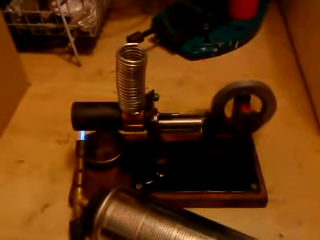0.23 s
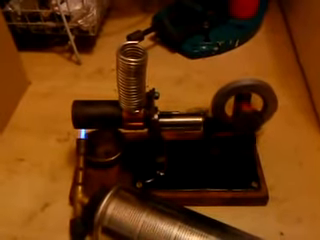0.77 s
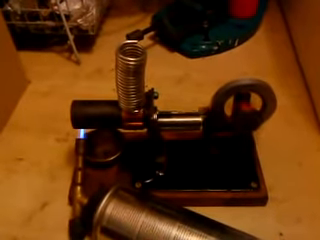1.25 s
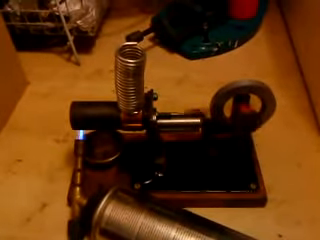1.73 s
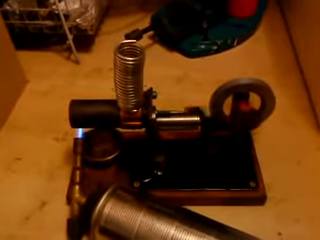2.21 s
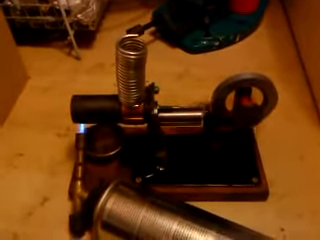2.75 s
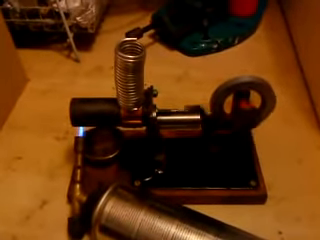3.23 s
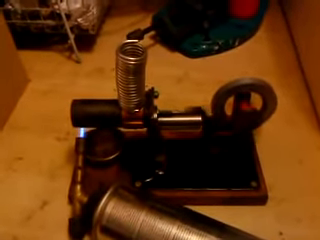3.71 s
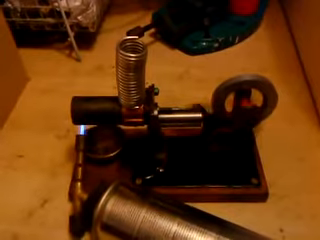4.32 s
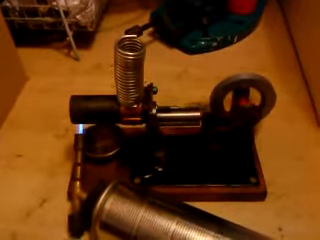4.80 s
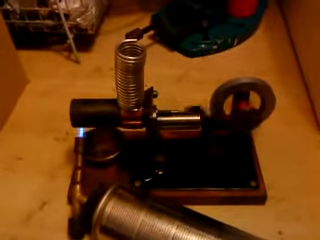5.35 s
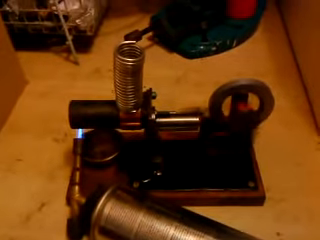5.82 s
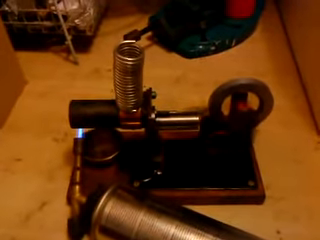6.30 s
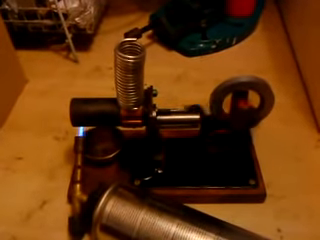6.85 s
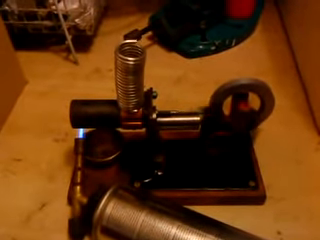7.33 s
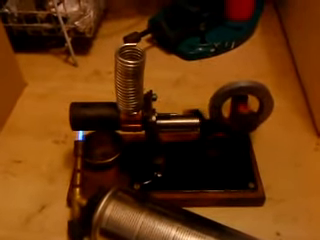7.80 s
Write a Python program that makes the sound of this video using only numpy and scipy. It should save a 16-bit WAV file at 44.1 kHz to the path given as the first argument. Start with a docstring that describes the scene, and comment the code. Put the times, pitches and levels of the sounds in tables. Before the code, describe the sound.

From 0 s a small hot-air engine is already running on a wooden base, close to the microphone, at nearly eight turns a second. Every turn has three blows: a sharp bright metallic clack, about an eighth of a second's quarter later a loose rattling knock over a soft thud, then around half a turn after the clack a duller tap and low wooden thump. Tiny random clicks and pin chatter fill the gaps; speed and force drift slightly. A gas torch hisses steadily with a fluttering edge and faint low rumble. At 5.2 s the rod gives a very short high squeak. Around 7.2-7.4 s the engine slows to under seven turns, the base shudders more and knocks grow bassier. It partly recovers, with another squeak at 7.8 s, the hiss rising slightly, and is still running at 8 s. Short, dry room reflections; mono, little extreme treble.

```python
"""A small hot-air engine turns about eight times a second on a wooden base; a gas torch hisses all along.
Each turn its slack closes three times: a sharp clack, a quarter turn later a rattling knock over a thud,
and half a turn after the clack a duller tap, then a thump of the base. The rod squeaks near 5.2 s.
Near 7.3 s the engine slows and labours: the base shudders more and the knocks gain bass. It recovers in
part, with another squeak at 7.8 s. Blows are ringing tones and noise bursts; the torch is steady noise."""
import sys
import numpy as np
from scipy import signal
from scipy.fft import rfft, irfft, next_fast_len
from scipy.io import wavfile
from scipy.ndimage import uniform_filter1d, map_coordinates

SR = 44100
rng = np.random.default_rng(int(sys.argv[2]) if len(sys.argv) > 2 else 0)


def master_out(mix):
    """Clip the mix to full scale and print it as 16-bit PCM to the path in sys.argv[1]."""
    frames = np.transpose(np.atleast_2d(mix))
    ceiling = np.clip(frames, -1, 1)
    pcm = np.round(ceiling * 32767).astype(np.int16)
    wavfile.write(sys.argv[1], SR, pcm)


N = 355446  # length of the scene in samples
LENGTH = 8192  # length of one blow in samples


def amp(db):
    """Turn dB into a plain factor."""
    return 10 ** (np.asarray(db) / 20)


def unit(x):
    """Scale a sound to an rms of 1."""
    return x / np.sqrt(np.mean(x ** 2) + 1e-20)


def at(curve, s):
    """Read a curve of (seconds, value) points at given times."""
    return np.interp(s, *np.transpose(curve))


def along(points, hz):
    """Read a curve of (Hz, value) points, with straight lines on a log frequency axis."""
    point_hz, value = np.transpose(points)
    return np.interp(np.log(hz + 1), np.log(point_hz + 1), value)


def noise(shape, spectrum):
    """Rows of noise with the given colour, scaled to an rms of 1 overall."""
    hz = np.fft.rfftfreq(shape[-1], 1 / SR)
    white = rfft(rng.standard_normal(shape))
    return unit(irfft(white * amp(along(spectrum, hz)), shape[-1]))


def wobble(rate):
    """A smooth random curve with the given number of random points a second."""
    points = rng.standard_normal(int(N * rate / SR) + 4)
    return map_coordinates(points, [np.arange(N) * rate / SR])


def placed(times, sounds):
    """Add up rows of sound, each starting at its own time."""
    first = np.round(np.asarray(times) * SR).astype(int)
    index = first[:, None] + np.arange(sounds.shape[1])
    return np.bincount(index.ravel(), sounds.ravel(), N + sounds.shape[1])[:N]


# The frequencies in Hz where the bass, middle and treble levels of a blow apply.
BAND_HZ = [400, 1800, 5000]


def strength(levels_db, hz):
    """Spread the three band levels of every blow, in dB, over all frequencies."""
    return np.array([along(np.transpose([BAND_HZ, row]), hz) for row in levels_db])


# Loudness of the flame. Each row: time in seconds, level in dB before the 4 dB cut in torch().
HISS_LEVEL = [(0.0, -36), (6.911, -35), (7.25, -34.5), (8.06, -30)]
# Colours of the flame and of the low rumble under it. Each row: frequency in Hz, relative level in dB.
FLAME_COLOUR = [(200, -3.5), (400, 4), (900, -4), (1700, 1.5), (2300, -2), (3000, -9.5), (4200, -2.5),
                (5300, -6.5), (6000, -12), (8000, -11), (9200, -42), (12000, -120)]
RUMBLE_COLOUR = [(15, -27), (25, -20), (48, 2.5), (107, -1.5), (125, -9), (160, -40.5), (280, -120)]


def torch():
    """The flame is noise whose level flutters fast and slowly; a faint low rumble lies under it."""
    m = next_fast_len(N)
    flutter_db = 1.8 * wobble(40) + 0.42 * wobble(5.9)
    hiss_db = at(HISS_LEVEL, np.arange(N) / SR) - 4.0 + flutter_db
    hiss = amp(hiss_db) * noise((m,), FLAME_COLOUR)[:N]
    rumble = amp(-57 + wobble(5)) * noise((m,), RUMBLE_COLOUR)[:N]
    return hiss + rumble


# The base shakes more as the engine labours. Each row: time in seconds, level in dB.
SHUDDER_LEVEL = [(0, -50), (6.8, -53.5), (7.3, -43.5), (8.06, -44)]


def shudder():
    """The base trembles on the table: low noise with an unsteady level."""
    colour = [(40, -34.0), (80, -1), (200, 1), (380, -7.0), (600, -25), (1200, -120)]  # (Hz, dB)
    level_db = at(SHUDDER_LEVEL, np.arange(N) / SR) + 1.2 * wobble(25)
    return amp(level_db) * noise((next_fast_len(N),), colour)[:N]


def rattle(levels_db, spectrum, crack_db, crack_t60, wash_db, wash_t60, rise, lumpy_db):
    """Pins chatter in their holes: a short crack and a longer, lumpy wash of noise (t60 and rise in s)."""
    t = np.arange(LENGTH) / SR
    shape = (len(levels_db), LENGTH)
    lumps = unit(uniform_filter1d(rng.standard_normal(shape), size=50))
    crack = amp(crack_db - 60 * t / crack_t60)
    wash = amp(wash_db - 60 * t / wash_t60 + lumpy_db * lumps)
    tilt = amp(strength(levels_db, np.fft.rfftfreq(LENGTH, 1 / SR)))
    tilted = irfft(rfft(noise(shape, spectrum)) * tilt, LENGTH)
    return tilted * (crack + wash) * (1 - np.exp(-t / rise))


# Colour of the pins' chatter in knocks, small ticks and strays.
# Each row: frequency in Hz, relative level in dB.
KNOCK_COLOUR = [(410, -21.5), (700, -11), (832, -27), (1620, -0.5), (2720, -3.5), (3100, -12), (3800, -2),
                (5250, -4), (7420, -11), (9200, -32.5), (12000, -76), (20200, -120)]


def strays():
    """The linkage makes tiny clicks at random moments, each a short rattle of random strength."""
    count = 110
    chance = rng.random((count, 3))
    levels_db = -44 + 6.9 * chance[:, [1, 1, 2]]  # bass and middle share one draw
    clicks = rattle(levels_db, KNOCK_COLOUR, 0, 0.0058, -18.5, .03, .0003, 2.5)
    return placed(chance[:, 0] * N / SR, clicks)


# Squeaks of the piston rod. Each row: start in seconds, length in seconds, pitch in Hz, middle level in dB.
ROD_SQUEAKS = [(5.224, 0.051, 5220, -42), (7.8, 0.068, 5290, -39)]


def squeaks():
    """The dry sliding rod sings briefly: a tone with slightly unsteady level and phase."""
    t = np.arange(N) / SR
    total = np.zeros(N)
    for start, length, hz, db in ROD_SQUEAKS:
        fade = np.clip(np.minimum(t - start, start + length - t) / .008, 0, 1)  # 8 ms at each end
        level = amp(db + 1.2 * wobble(80))
        total += level * fade * np.sin(2 * np.pi * hz * t + .4 * wobble(120))
    return total


# Speed of the flywheel, which drifts, slows near 7.3 s and partly recovers.
# Each row: time in seconds, turns per second.
TURNING_SPEED = [(0, 7.824), (.2, 8.023), (.92, 7.842), (1.58, 7.751), (2.42, 8.136), (3.2, 7.728),
                 (3.8, 8.112), (3.98, 8.142), (5.42, 7.817), (5.6, 7.914), (6.02, 8.208), (6.74, 7.823),
                 (6.98, 8.019), (7.34, 6.727), (7.52, 7.033), (8.06, 7.328)]
# How hard the slack closes. Each row: time in seconds, force in dB before each blow's share of it.
CLOSING_FORCE = [(0, -1), (.35, 0.54), (1.2, -1.4), (1.63, 1.3), (2.3, -1.04), (2.9, 0), (3.4, 1.76),
                 (3.6, 0.5), (4, 1.5), (4.65, -1.1), (4.95, 0.3), (5.8, 0), (6.15, -0.6), (6.62, 1.5),
                 (7.15, 0), (7.43, -4), (7.6, 0.3), (8.06, 3)]
# How much the engine labours. Each row: time in seconds, amount where 1 is about full labour.
LABOURING = [(0, 0.26), (6.9, 0.15), (7.1, 0.34), (7.33, 1.05), (7.5, 0.88), (7.8, 0.92), (8.06, 0.4)]
# The five tables below have one row each for clack, knock and tap; the last four list bass, middle, treble.
# Each row: crank angle in turns, lag in seconds, random timing spread in seconds.
BLOW_MOMENT = [(0, 0, .0003), (.1, .0195, .0006), (.4, .0156, .0006)]
# Each row: the three usual levels in dB.
USUAL_LEVEL = [(-1, -0.14, -1.67), (-2, -3.5, -2.5), (-1.34, -0.4, 1.5)]
# Each row: the three shares of the force in dB that the blow follows.
FORCE_SHARE = [(0.78, 1.1, 1), (0.55, 1.3, 1.1), (.8, .7, .6)]
# Each row: the three gains in dB per unit of labour.
LABOUR_GAIN = [(.8, .8, -2.5), (11.3, .4, -0.6), (.2, 5, 1.2)]
# Each row: the three random level spreads in dB.
LEVEL_SPREAD = [(.7, .9, .5), (1.2, 1.5, 1.1), (.7, 1.2, .9)]


def blows(order):
    """The turning crank closes the slack once a turn: times in s and three band levels in dB per blow."""
    lead = SR // 10  # begin 0.1 s early
    t = np.arange(-lead, N) / SR
    turns = np.cumsum(at(TURNING_SPEED, t)) / SR
    turns = turns - turns[lead] + .1587  # the crank position in turns at time 0
    angle, lag, jitter = BLOW_MOMENT[order]
    chance = rng.standard_normal((int(turns[-1]) + 1, 4))
    crank_s = np.interp(np.arange(len(chance)) + angle, turns, t, right=N / SR)
    s = crank_s + lag + jitter * chance[:, 0]
    force_db = np.outer(at(CLOSING_FORCE, s), FORCE_SHARE[order])
    labour_db = np.outer(at(LABOURING, s), LABOUR_GAIN[order])
    levels_db = USUAL_LEVEL[order] + force_db + labour_db + LEVEL_SPREAD[order] * chance[:, 1:]
    heard = (s > .005) & (s < N / SR)
    return s[heard], levels_db[heard]


# Ringing tones of the wooden base. Each row: pitch in Hz, time to fall 60 dB in seconds,
# then level in dB under a clack, a knock and a tap, before the blow's own strength.
BASE_TONES = [(56.7, 0.54, -59, -49.5, -40), (98, 0.05, -74, -47, -56.5), (141.5, 0.2, -35.5, -34, -29.5),
              (225, 0.13, -52.5, -49, -31.5), (268.8, 0.12, -42, -43.5, -30.5),
              (291.3, 0.2, -36.5, -41, -35), (366.7, 0.13, -42, -40, -37.5), (410, 0.019, -51, -48, -46.5),
              (506.6, 0.19, -44.5, -34.5, -33), (571.2, 0.07, -32.5, -29.5, -22.5),
              (622, 0.22, -53, -40, -40), (752, 0.062, -35.5, -36.5, -38.5),
              (911, 0.069, -35.5, -37, -39.5), (998, 0.29, -61.5, -43, -48),
              (1216.6, 0.056, -35.5, -30.5, -29)]
# Pitches in Hz of the ringing metal parts.
METAL_PITCH = [1361, 1532, 1647, 1793, 1911, 2094, 2430, 2718, 3111, 3492, 3762, 3830, 3951, 4037, 4204,
               4400, 4708, 4850, 5033, 5187, 5372, 5560, 6040, 6476, 6944, 7342, 7628]
# The same metal tones. Each row: time to fall 60 dB in seconds,
# then level in dB under a clack, a knock and a tap, before the blow's own strength.
METAL_TONES = [(0.046, -42, -49, -40), (0.078, -32, -30, -36), (0.065, -45, -34.5, -28),
               (0.051, -26, -35, -35), (0.06, -39.5, -34, -36), (0.048, -40, -28.5, -31),
               (0.03, -46.5, -43.5, -32), (0.07, -39, -42, -47), (0.02, -56.5, -48, -55.5),
               (0.04, -25, -48, -36), (0.08, -30, -40, -39), (0.065, -22.5, -33, -34),
               (0.05, -27, -31, -31), (0.06, -31, -39, -34), (0.045, -29, -42, -35), (0.04, -32, -40, -31),
               (0.05, -30, -39, -40), (0.055, -34, -45, -39), (0.05, -26, -33, -29), (0.06, -27, -27, -34),
               (0.034, -20, -31, -31), (0.044, -35, -42, -30), (0.07, -34, -37, -45),
               (.07, -38, -55, -51.5), (0.09, -40, -45, -47), (0.022, -27, -31, -53),
               (0.017, -40, -48, -52)]
# Random timing spread between the tones, in seconds, for clack, knock and tap.
TONE_SLIP = [.000012, .00005, .00003]


def ringing(levels_db, order, rise):
    """A blow makes base and metal ring; timing slips shift the phase of high tones the most (rise in s)."""
    t = np.arange(LENGTH) / SR
    modes = np.vstack([BASE_TONES, np.column_stack([METAL_PITCH, METAL_TONES])])
    hz, t60, mode_db = modes[:, 0], modes[:, 1], modes[:, 2 + order]
    growth = 1 - np.exp(-t / (rise + 0.29 / hz[:, None]))  # heavy low tones take a while to start
    decay = amp(-60 * t / t60[:, None]) * (1 - t / t[-1])
    swing = decay * growth * np.exp(2j * np.pi * hz[:, None] * t)
    chance = rng.standard_normal((len(levels_db), 2, len(hz)))
    # neighbouring metal tones swing opposite ways
    side = np.r_[np.ones(len(BASE_TONES)), (-1) ** np.arange(len(METAL_TONES))]
    spread_db = 1.3 * chance[:, 0]
    size = side * amp(mode_db + strength(levels_db, hz) + spread_db)
    phase = 2 * np.pi * hz * TONE_SLIP[order] * chance[:, 1]
    return np.imag((size * np.exp(1j * phase)) @ swing)


def swell(hz, rise):
    """A soft push: a tone that grows to its peak after rise seconds, then dies away."""
    t = np.arange(LENGTH) / SR
    return np.sin(2 * np.pi * hz * t) * (t / rise * np.exp(1 - t / rise)) ** 2


def ticks(s, levels_db, table):
    """Pins touch briefly around each blow, with small random shifts of time and strength."""
    total = np.zeros(N)
    for delay, middle_db, treble_db in table:
        chance = rng.standard_normal((len(s), 2))
        tick_db = levels_db + [middle_db, middle_db, treble_db] + 2.0 * chance[:, :1]
        tick = rattle(tick_db, KNOCK_COLOUR, 0, 0.021, -9.5, 0.056, 0.00031, 2.0)
        tick_s = s + delay + .0007 * chance[:, 1]
        total += placed(np.maximum(tick_s, 0), tick)
    return total


# Colour of the chatter after a tap. Each row: frequency in Hz, relative level in dB.
TAP_COLOUR = [(410, -31.5), (700, -14.5), (907, -30.5), (1710, 1), (2580, -9), (3970, -4), (4670, -8.5),
              (7830, -9.5), (8350, -19), (9200, -47.5), (12000, -96), (20200, -120)]
# Small ticks around a tap. Each row: delay in seconds (negative is before),
# bass and middle level in dB, treble level in dB, both added to the tap's own.
TICKS_AT_TAP = [(-.0045, -39.5, -33), (.007, -21.5, -38), (.027, -47, -40.5), (0.039, -51.5, -60.5)]


def taps():
    """Half a turn on the slack closes the other way; the base thumps as the stroke reverses."""
    s, levels_db = blows(order=2)
    ring = ringing(levels_db, order=2, rise=0.0017)
    chatter = rattle(levels_db, TAP_COLOUR, -22, 0.0098, -29.5, 0.074, 0.0013, 0.7)
    thump_db = -30.0 + 0.28 * levels_db[:, :1] + 0.5 * rng.standard_normal((len(s), 1))
    thump = amp(thump_db) * swell(146.3, 0.014)
    tap = placed(s, ring) + placed(s - .0008, chatter) + placed(s + 0.01307, thump)
    return tap + ticks(s, levels_db, TICKS_AT_TAP)


# Small ticks around a knock. Each row: delay in seconds (negative is before),
# bass and middle level in dB, treble level in dB, both added to the knock's own.
TICKS_AT_KNOCK = [(-.0045, -26.5, -23.5), (.006, -21, -33), (0.011, -29.5, -36)]


def knocks():
    """About a quarter turn after the clack a soft thud shakes the base while the pins rattle loosely."""
    s, levels_db = blows(order=1)
    labour_db = 1 * at(LABOURING, s)[:, None]  # 1 dB per unit of labour
    thud_db = -27.0 + labour_db + 0.3 * rng.standard_normal((len(s), 1))
    thud = amp(thud_db) * swell(247.2, 0.0074)
    ring = ringing(levels_db, order=1, rise=0.0012)
    chatter = rattle(levels_db, KNOCK_COLOUR, -19.0, 0.0059, -27.5, 0.087, 0.00038, 4.4)
    return placed(s - .003, ring + thud) + placed(s, chatter) + ticks(s, levels_db, TICKS_AT_KNOCK)


# Colour of the chatter and scrape of a clack. Each row: frequency in Hz, relative level in dB.
CLACK_COLOUR = [(410, -36), (700, -6), (988, -23), (1830, 0.5), (3030, -4.5), (3840, -1), (5310, -7.5),
                (7580, -3.5), (8440, -16.5), (9200, -29), (12000, -64), (20200, -120)]


def clacks():
    """The sharpest blow: a snap, ringing and chatter, with a scrape of varying strength just ahead."""
    s, levels_db = blows(order=0)
    middle_db, treble_db = levels_db[:, 1:2], levels_db[:, 2:3]
    snap_db = -9.5 + 1.5 * rng.standard_normal((len(s), 1))
    high_snap = amp(snap_db + treble_db) * swell(4500, .0006)
    low_snap = amp(-23.5 + middle_db) * swell(1850, .0008)
    ring = ringing(levels_db, order=0, rise=0.00024)
    chatter = rattle(levels_db, CLACK_COLOUR, -18.0, 0.011, -25.5, 0.094, 0.00028, 3.5)
    scrape = rattle(levels_db, CLACK_COLOUR, -24.5, 0.039, -52.5, 0.039, 0.0016, 2.5)
    scrape = scrape * amp(5 * rng.standard_normal((len(s), 1)))
    return placed(s, high_snap + low_snap + ring + chatter) + placed(s - .0025, scrape)


# Echoes from the table top and near walls. Each row: delay in seconds, level in dB.
NEAR_ECHOES = [(.0029, -19), (.0058, -29.5), (.011, -20.5)]


def room(x):
    """Near surfaces return weak copies, then a short diffuse tail with little bass."""
    t = np.arange(SR // 3) / SR
    colour = [(150, -13.0), (1200, -2.0), (8000, -2.5)]  # (Hz, dB)
    tail = noise((len(t),), colour) * amp(-60 * t / 0.11) * (t > .008)
    response = amp(-13.5) * tail / np.linalg.norm(tail)
    response[0] = 1  # the direct sound
    for delay, db in NEAR_ECHOES:
        response[round(delay * SR)] += amp(db)
    return signal.fftconvolve(x, response)[:N]


def scene():
    """The engine sounds in the room, over the shudder of the base and the torch."""
    engine = clacks() + knocks() + taps() + strays() + squeaks()
    return (room(engine) + shudder() + torch())[None]


def record(dry):
    """The microphone drops the deepest bass, rolls off steeply on top and keeps nothing from 9400 Hz up."""
    m = next_fast_len(N + SR // 2)
    hz = np.fft.rfftfreq(m, 1 / SR)
    bass = 1 / np.sqrt(1 + (42 / (hz + 1)) ** 8)
    slope = amp(-55 * np.clip((hz - 8000) / 1400, 0, 1) ** 3.4)
    return irfft(rfft(dry, m) * bass * slope * (hz < 9400), m)[..., :N]


dry = scene()
out = record(dry)
master_out(out)
```